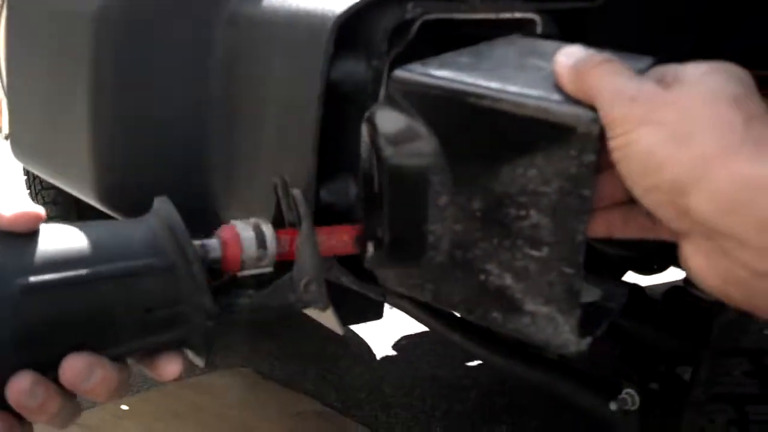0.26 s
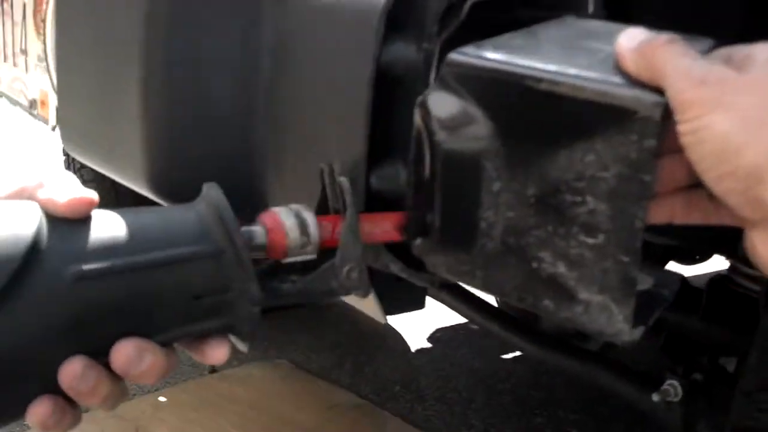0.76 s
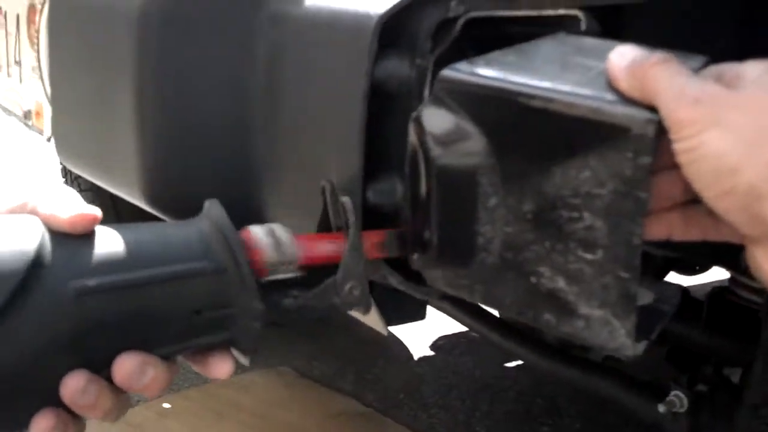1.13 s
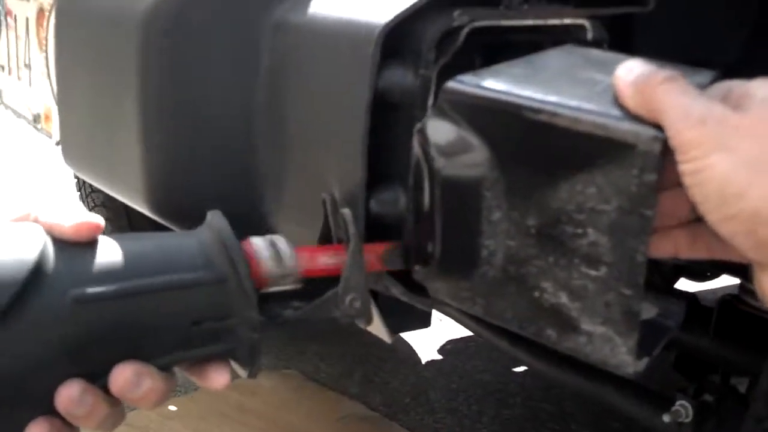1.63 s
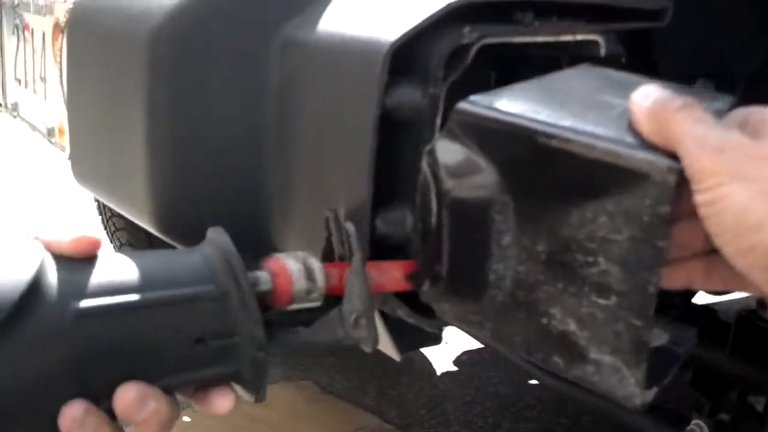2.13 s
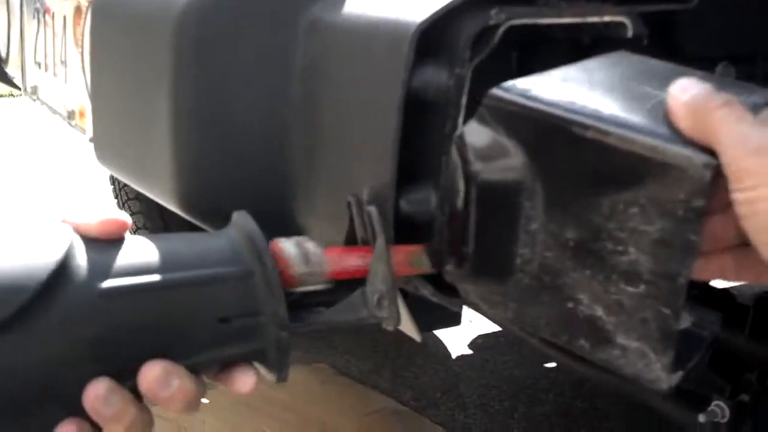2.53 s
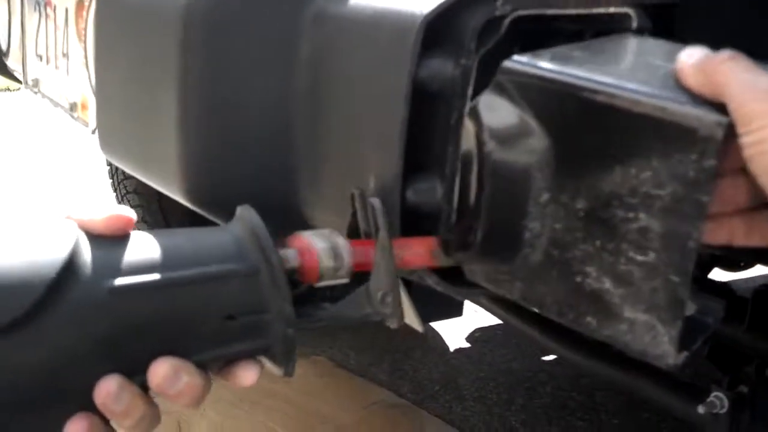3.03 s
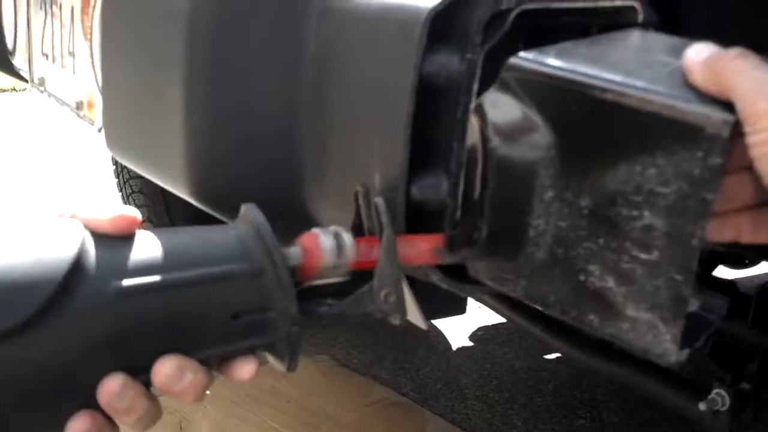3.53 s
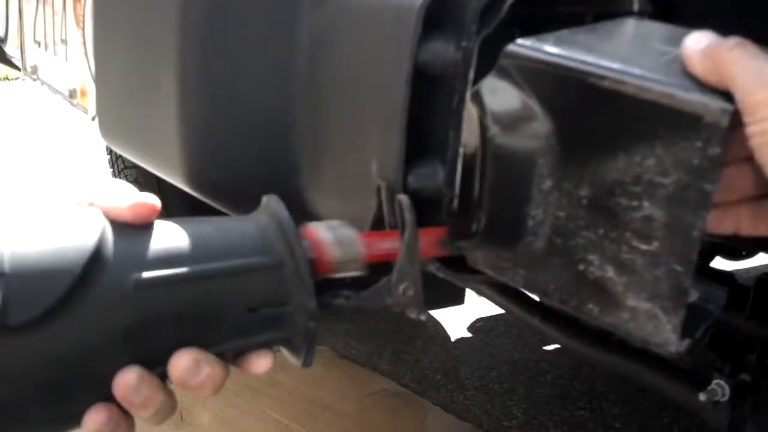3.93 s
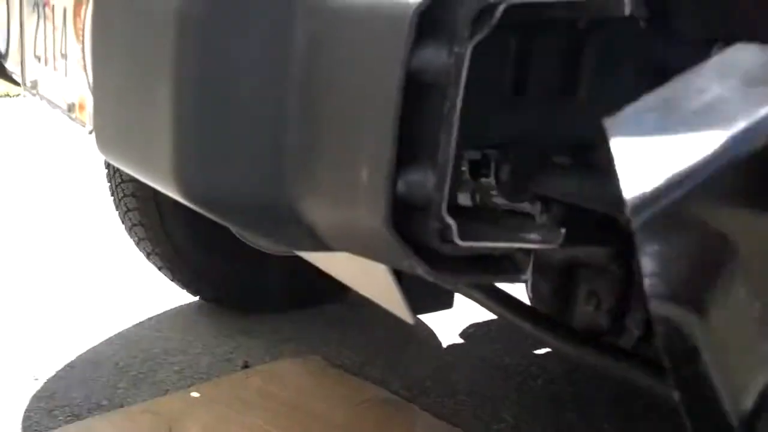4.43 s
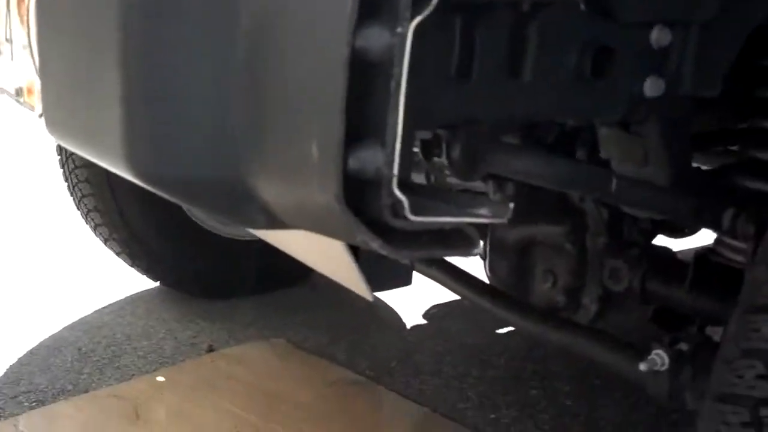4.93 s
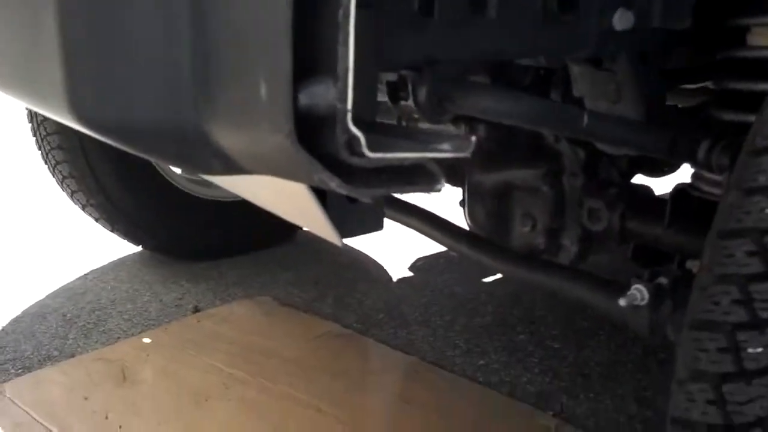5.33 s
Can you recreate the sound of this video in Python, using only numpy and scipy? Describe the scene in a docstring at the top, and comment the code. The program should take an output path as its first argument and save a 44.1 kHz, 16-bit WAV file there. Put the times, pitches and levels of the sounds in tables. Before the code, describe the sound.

A reciprocating saw revs up and chatters harshly through a steel bumper, breaks free, whines down, and the cut piece clangs on the floor.

```python
"""Reciprocating saw cutting a steel bumper

A motor speeds up; its blade catches, then cuts the end off a steel bumper, chattering on every stroke.
The blade breaks through, the motor runs free and coasts down while its cooling air buffets the microphones,
and the cut-off piece clangs on the floor. Noise and clicks excite resonances; tones follow the motor speed.
Two close microphones are combined into a wide stereo pair."""
import sys
import numpy as np
from scipy import signal
from scipy.fft import rfft, irfft, next_fast_len
from scipy.io import wavfile
from scipy.ndimage import uniform_filter1d

SR = 44100
rng = np.random.default_rng(int(sys.argv[2]) if len(sys.argv) > 2 else 0)


def output_pcm(signal):
    """Save a mono or channel-first signal as 16-bit PCM at the path in sys.argv[1].

    Samples are clipped to [-1, 1] before scaling.
    """
    pcm = np.clip(np.atleast_2d(signal).T, -1, 1) * 32767
    wavfile.write(sys.argv[1], SR, np.round(pcm).astype(np.int16))


N = 246078
TIME = np.arange(N) / SR
# Levels in the tables are relative: later gains set the final loudness.


def from_db(db):
    """Logarithmic level: decibels to amplitude gain."""
    return 10 ** (np.asarray(db) / 20)


def rms_one(x):
    """Normalisation: scale to unit root mean square."""
    return x / np.sqrt(np.mean(x ** 2) + 1e-20)


def level(x):
    """Gain control: hold the running rms near 1 over about two full-speed strokes."""
    return x / np.sqrt(np.abs(uniform_filter1d(x * x, SR // 22)) + 1e-9)


def in_time(rows):
    """Linear interpolation: each column of a curve, at every sample."""
    s, *columns = np.transpose(rows)
    return [np.interp(TIME, s, c) for c in columns]


def butter(x, hz, kind, order=2):
    """Causal Butterworth filtering."""
    return signal.sosfilt(signal.butter(order, hz, kind, fs=SR, output="sos"), x + 1e-18)


def colour(x, spectrum):
    """Spectral shaping: weight each frequency by a smooth curve on a logarithmic axis."""
    size = next_fast_len(N + 4096)
    hz, db = np.transpose(spectrum)
    bins = np.fft.rfftfreq(size, 1 / SR) + 1
    gain = from_db(np.interp(np.log(bins), np.log(hz), db))
    return irfft(rfft(x, size) * gain, size)[..., :N]


def drift(rate):
    """Slow random modulation of rms 1, changing about rate times a second."""
    knots = rng.standard_normal(4096)
    return rms_one(np.interp(TIME * rate, np.arange(len(knots)), knots))


def resonance(x, hz, width):
    """Damped oscillator: a two-pole resonance with gain 1 at its top."""
    r = np.exp(-np.pi * width / SR)
    poles = [1, -2 * r * np.cos(2 * np.pi * hz / SR), r * r]
    return signal.lfilter(np.array([1, 0, -1]) * (1 - r * r) / 2, poles, x + 1e-18)


def bursts(events, t60):
    """Exponential decay: an envelope that jumps at each (start_s, level_db) and dies away."""
    return sum((TIME >= s) * from_db(db - 60 * np.abs(TIME - s) / t60) for s, db, *_ in events)


def knocks(turns, contacts, loose, scatter_db, slip):
    """Periodic impacts with jitter: looseness scatters the moment and strength of each click."""
    out = np.zeros(N)
    for share, db in contacts:
        early, force = rng.standard_normal((2, 300))
        cycle = np.arange(len(early)) + share
        play = np.interp(cycle, turns, loose)
        at = np.searchsorted(turns, cycle + slip * play * early)
        heard = at < N
        out[at[heard]] += from_db(db + scatter_db * play * force)[heard]
    return rms_one(out)


def smear(clicks, seconds):
    """Relaxation: each click becomes a decaying swell of the given time constant; mean 1."""
    swell = signal.lfilter([1], [1, -np.exp(-1 / (seconds * SR))], np.abs(clicks) + 1e-18)
    return swell / swell.mean()


def at_microphones(x, apart_hz=750, scatter_db=-1, nearer_db=2.0):
    """Diffuse reflection: echoes off the car body differ between microphones, except in the bass."""
    size, scatter_s = 2048, 0.0066
    echoes = rfft(rng.standard_normal(size) * np.exp(-TIME[:size] / scatter_s))
    # keep only the phase, so that the echoes favour no pitch
    even = np.roll(irfft(echoes / np.abs(echoes)), SR // 1000)[:size // 2]
    apart = from_db(scatter_db) * butter(signal.fftconvolve(x, even)[:N], apart_hz, "high", order=1)
    return x * from_db([[nearer_db], [-nearer_db]]) + np.array([apart, -apart])


# Spectrum of turbulent pressure on the microphones: pitch_hz, level_db
TURBULENCE_SPECTRUM = [(20, 4.5), (60, -7), (120, -2.5), (220, -6.5), (400, -16), (800, -26), (3000, -68)]
# Strong gusts of cooling air: centre_s, level_db, half_length_s
AIR_GUSTS = [(0.98, -27, 0.02), (1.33, -27.5, 0.06), (1.52, -28, 0.035), (3.81, -32, 0.05),
             (4.19, -34, 0.14), (4.465, -25, 0.06), (4.85, -29, 0.2)]


def draught(speed, draught_db=0, eddy_db=-52, eddy_swing_db=6, deep_db=-3, rumble_db=-59):
    """Turbulence: lumpy noise, independent at each microphone; only strong gusts bring much deep bass."""
    gust = sum(from_db(db) * np.exp(-((TIME - s) / width) ** 4) for s, db, width in AIR_GUSTS)
    stray = speed ** 2 * from_db(eddy_db + eddy_swing_db * drift(10))
    eddies = rms_one(colour(rng.standard_normal((2, N)), TURBULENCE_SPECTRUM))
    light = butter(eddies, 110, "high", order=3)
    deep = butter(eddies, [55, 110], "band", order=3)
    reach = from_db(deep_db) * np.minimum(gust / .05, 1)
    flutter = from_db(draught_db + 4.3 * drift(70))
    return flutter * (gust + stray) * (light + reach * deep) + from_db(rumble_db) * eddies


# The piece lands and bounces: start_s, level_db, flatness (0 on an edge, 1 flat)
LANDINGS = [(5.269, -24.5, 0), (5.348, -36, .6), (5.399, -29, 1)]
# Modes of the piece: pitch_hz, edge_level_db, flat_level_db, t60_s
PIECE_MODES = [(281, -15, -15, .5), (523, -17, -16, .6), (575, -16, -18, .5), (593, -6, -9, .8),
               (1094, -7, -4, .9), (1158, -15, -15, .6), (1432, 1, -12, .6), (1623, -15, -5, .9),
               (1836, -13, -9, .8), (1970, -14, -16, .8), (2147, -11, -10, .6), (3203, -14, -22, .7),
               (3461, -19, -14, .7), (3698, -20, -13, .8), (3732, -20, -16, .8), (3780, -16, -18, .7),
               (4226, -22, -15, .8), (4418, -20, -11, .6), (4544, -22, -14, .7), (4732, -14, -12, .6),
               (5170, -15, -18, .4), (5970, -15, -13, .35), (6405, -21, -9, .5), (7251, -15, -20, .28),
               (9700, -24, -21, .27)]
# Spectrum of rough contact, on the floor and in the gears: pitch_hz, level_db
ROUGH_SPECTRUM = [(60, -59), (150, -13), (500, 1), (1000, -4), (1800, -14), (2600, 1), (4000, -10),
                  (8000, -17.5), (16000, -15)]
SETTLES_S, SETTLE_DB_PER_S = 5.49, 108


def falling_piece(crack_db=-13, scuff_db=-11, buzz_db=-6, taps_per_s=260):
    """Modal ringing: each landing adds energy; tiny floor taps buzz until the piece settles and is damped."""
    out = np.zeros(N)
    t = TIME[TIME >= LANDINGS[0][0]]
    for hz, edge_db, flat_db, t60 in PIECE_MODES:
        rings = []
        for s, db, flat in LANDINGS:
            struck_db = db + edge_db + flat * (flat_db - edge_db)
            rings.append((t >= s) * from_db(struck_db - 60 * (t - s) / t60))
        # energies add, so amplitudes combine as a root of squares
        out[-len(t):] += np.linalg.norm(rings, axis=0) * np.sin(2 * np.pi * (hz * t + rng.random()))
    taps = (rng.random(N) < taps_per_s / SR) * rng.choice([-1, 1], N)
    buzz = rms_one(sum(from_db((edge_db + flat_db) / 2) * resonance(taps, hz, 70)
                       for hz, edge_db, flat_db, _ in PIECE_MODES))
    grit = rms_one(colour(smear(taps, seconds=.005) * rng.standard_normal(N), ROUGH_SPECTRUM))
    out += from_db(crack_db) * bursts(LANDINGS, t60=0.022) * grit
    skitter = bursts(LANDINGS, t60=0.51) - bursts(LANDINGS, t60=0.055)
    out += skitter * (from_db(scuff_db) * grit + from_db(buzz_db) * buzz)
    return out * from_db(-SETTLE_DB_PER_S * np.maximum(TIME - SETTLES_S, 0))


# Dull knocks, as the saw jolts in the cut and is then pulled away: start_s, level_db, pitch_hz
JOLT_KNOCKS = [(1.277, -15, 330), (1.359, -14, 300), (1.794, -19, 290), (1.886, -16, 300),
               (3.774, -14, 270), (4.313, -13, 320), (4.772, -11.5, 300), (4.838, -19, 260),
               (4.867, -20, 620), (4.885, -22, 460), (4.937, -24, 510), (4.944, -16, 215),
               (5.007, -28, 312)]


def thumps(grit_db=-16):
    """Heavily damped oscillation: each knock is a few cycles with a brief scuff."""
    out = np.zeros(N)
    scuff = rms_one(butter(rng.standard_normal(N), [300, 800], "band", order=3))
    cycles = 7  # until 60 dB down
    for s, db, hz in JOLT_KNOCKS:
        age = np.maximum(TIME - s, 0)
        knock = np.sin(2 * np.pi * hz * age) + from_db(grit_db) * scuff
        out += bursts([(s, db)], t60=cycles / hz) * knock
    return butter(out, [110, 1100], "band")


# Motor speed, as the pitch of its fan: trigger half pressed, at full speed in the cut, running free
START_HZ, CUTTING_HZ, FREE_HZ = 2300, 4532, 4660
# The trigger is squeezed around SQUEEZE_S; the blade breaks through; the trigger is let go
SQUEEZE_S, THROUGH_S, LET_GO_S = 0.75, 4.306, 4.57
# Time constants: speeding up, being pinched by the sagging piece, racing free, coasting
SPIN_UP_S, PINCH_S, RACE_S, COAST_S = 0.18, 0.3, 0.13, 1.32
PINCH_HZ, WAVER_HZ = 95, 10
FAN_CYCLES_PER_STROKE = 102.1


def fan_pitch():
    """Rotor inertia: speed up, be pinched as the cut closes, race once free, then coast down."""
    driven = START_HZ + (CUTTING_HZ - START_HZ) / (1 + np.exp((SQUEEZE_S - TIME) / SPIN_UP_S))
    pinch = PINCH_HZ * np.exp(np.minimum(TIME - THROUGH_S, 0) / PINCH_S)
    loaded = driven - pinch + WAVER_HZ * drift(5)
    freed = 1 - np.exp(-np.clip(TIME - THROUGH_S, 0, LET_GO_S - THROUGH_S) / RACE_S)
    return (loaded + freed * (FREE_HZ - loaded)) * np.exp(-np.maximum(TIME - LET_GO_S, 0) / COAST_S)


def gear_drone(fan_hz, turns):
    """Harmonic tones: gears loaded by speeding up drone on a few multiples of the stroke rate."""
    drone_db = -34
    speed = fan_hz / CUTTING_HZ
    pull = np.clip(1 - speed, 0, 1) ** .7 * speed ** 6 * np.clip((1.4 - TIME) / .15, 0, 1)
    tones = 0
    for k in range(9, 12):
        phase = 2 * np.pi * (k * turns + rng.random()) + .3 * drift(20)
        tones = tones + from_db(3 * drift(14)) * np.sin(phase)
    return from_db(drone_db) * pull / pull.max() * rms_one(tones)


# Resonances of the motor's vents: pitch_hz, width_hz, level_db
VENT_MODES = [(4560, 350, -2), (3950, 400, -3), (3100, 200, -1), (6400, 700, -10), (9150, 400, 0)]


def whine(turns, speed, whine_db=-35.0):
    """Source and filter: fluttering fan overtones stand out where they meet vent resonances."""
    phase = 2 * np.pi * FAN_CYCLES_PER_STROKE * turns + .4 * drift(130)
    overtones = [(1, 0), (2, 0), (3, -9)]  # multiple, level_db
    tones = sum(from_db(db + 2 * drift(60)) * np.sin(k * phase) for k, db in overtones)
    # alternate the polarity from one table row to the next
    vents = sum((-1) ** k * from_db(db) * resonance(tones, hz, width)
                for k, (hz, width, db) in enumerate(VENT_MODES))
    return from_db(whine_db) * speed ** 2 * vents


# Spectrum of the fan rush: pitch_hz, level_db
FAN_RUSH_SPECTRUM = [(60, -55), (140, -15), (300, 11.5), (800, 4.5), (1700, 8.5), (2500, 9.5), (4000, -1),
                     (7000, 5), (10000, -1.5), (16000, -7.5)]
# Crank knocks: two strong ones per stroke, half a cycle apart, each followed by a lighter one:
# share_of_cycle, level_db
CRANK_KNOCKS = [(.1, 0), (.35, -4), (.6, -1), (.85, -5)]
CASE_HZ, CASE_WIDTH_HZ = 1644, 460


def motor(fan_hz, turns, air_db=-28.5, air_power=3.5, gears_db=-38, case_db=-42):
    """Flow noise grows as a power of speed; gears whirr and crank impacts ring the gear case."""
    speed = fan_hz / fan_hz.max()
    rush = rms_one(colour(rng.standard_normal((2, N)), FAN_RUSH_SPECTRUM))
    air = from_db(air_db + drift(150)) * speed ** air_power * rush
    impacts = knocks(turns, CRANK_KNOCKS, np.ones(N), scatter_db=1, slip=.012)
    whirr = smear(impacts, seconds=.02) * rng.standard_normal(N)
    rattle = smear(impacts, seconds=.005) * rng.standard_normal(N)
    gears = from_db(gears_db) * rms_one(colour(whirr, ROUGH_SPECTRUM))
    case = from_db(case_db) * rms_one(resonance(rattle, CASE_HZ, CASE_WIDTH_HZ))
    return air + at_microphones(gears + case) + at_microphones(whine(turns, speed))


def disperse(x, delay_s=.004):
    """Dispersion: bending waves cross sheet steel faster the higher they are; the delay is that at 1 kHz."""
    size = next_fast_len(N + 4096)
    hz = np.fft.rfftfreq(size, 1 / SR)
    return irfft(rfft(x, size) * np.exp(-4j * np.pi * delay_s * np.sqrt(1000 * hz)), size)[:N]


# Strong bumper resonances: pitch_hz, width_hz, level_db
BUMPER_MODES = [(289, 51, 4.5), (500, 130, -13), (694, 9.1, -1), (1029, 62, -1), (1398.7, 29.5, 2),
                (1963, 8.4, -0.5), (1636, 6.3, -0.5), (1097, 31, -5.5), (2010, 17, -5), (2560, 14, 6.5),
                (3193, 14.2, 6), (3458, 4.3, 4), (4630, 23, -4), (5800, 8.5, 4), (6795, 26, -6.5)]
# Response of the dense, damped modes of the sheet: pitch_hz, level_db
PANEL_RESPONSE = [(60, -48), (150, -68), (250, -13.5), (500, 1.5), (850, -2.5), (1200, -10), (2000, -49),
                  (2800, 15), (4000, -65), (8000, -39), (16000, -51)]


def bumper(force, panel_db=-9, gap_hz=1275, gap_width_hz=90, gap_depth=0.79):
    """Modal superposition: strong resonances stand over the dense, damped modes of the sheet steel."""
    rings = sum(from_db(db) * resonance(force, hz, width) for hz, width, db in BUMPER_MODES)
    steel = rings + from_db(panel_db) * colour(force, PANEL_RESPONSE)
    # a dip in level around 1275 Hz, between two strong resonances
    return steel - gap_depth * resonance(steel, gap_hz, gap_width_hz)


# Steady shaking of the bumper: multiple_of_stroke_rate, level_db
SHAKE_HARMONICS = [(7, 7), (12, -11), (14, -10), (15, -5), (16, 1), (18, -9), (20, -11), (21, -10),
                   (22, -10), (23, 2), (24, -10), (31, -5), (32, 0), (33, -7), (34, -10), (37, -4),
                   (38, -8), (40, -5), (41, -10), (42, -8), (44, -5), (45, -7), (46, -6), (47, -8),
                   (48, -7)]


def shake(struck, turns, waver_db=4):
    """Forced vibration: stroke-rate harmonics, in step with the hammering that feeds them, waver a little."""
    out, wander = 0, .3  # phase wander in radians
    for k, db in SHAKE_HARMONICS:
        phase = 2 * np.pi * k * turns
        lead = np.angle(struck[::4] @ np.exp(-1j * phase[::4]))
        out = out + from_db(db + waver_db * drift(7.7)) * np.cos(phase + lead + wander * drift(16))
    return rms_one(out)


# The blade passes nodes and antinodes of the main resonances:
# pitch_hz, mean_db, swing_db, antinode_depth, antinode_spacing (depths as shares of the slot)
ANTINODES = [(359, -4.5, 8, 0.0033, 1.22), (644, 2, 3, 0.46, 0.58), (986, -1, 4.5, 0.83, 0.8),
             (1440, 2, 1, 0.2, 1.9), (2010, 0, 7.5, 0.75, 3)]
# The slot deepens faster as less steel is left: depth 0-1 = (share of the cutting time) ** DEEPENING
DEEPENING = 1.03


def slot_depth(x, width_hz=206):
    """Mode shapes: as the slot deepens, the place of contact favours one resonance after another."""
    depth = np.minimum(TIME / THROUGH_S, 1) ** DEEPENING
    out = x
    for hz, mean_db, swing_db, antinode, spacing in ANTINODES:
        gain = from_db(mean_db + swing_db * np.cos(2 * np.pi * (depth - antinode) / spacing))
        out = out + (gain - 1) * resonance(x, hz, width_hz)
    return out


# The blade bears on one resonance and makes it sing, or damps it: start_s, end_s, pitch_hz, level_db
# (a row that ends well before it starts stays silent)
SUNG_MODES = [(1.0, 0.98, 1540, 2.5), (1.2, 1.2, 720, 0), (1, 2.3, 1130, 1.5), (2, 1.3, 1470, 6.5),
              (1.886, 2.224, 1380, 2.5), (2.233, 2.3, 1350, -3), (2.21, 3.5, 670, 3), (2.4, 2.6, 336, 4.5),
              (2.92, 3.29, 1430, -5.5), (2.955, 3, 990, 2.5), (2.3, 3.718, 1540, -2),
              (3.72, 4.298, 830, 5.5), (3.5, 4.314, 690, 4.5), (3.4, 3.84, 1420, 4),
              (3.84, 4.19, 1650, 8.5), (4.2, 4.31, 1540, 7), (5.1, 4.31, 1960, 3)]


def singing(x, turns, width_hz=130, fade_s=0.013):
    """Selective resonance: a favoured mode swells and throbs once a stroke; a damped one recedes."""
    throb = 1 + .7 * np.cos(2 * np.pi * (turns - .15))
    out = x
    for start, end, hz, db in SUNG_MODES:
        held = np.clip(np.minimum(TIME - start, end - TIME) / fade_s + .5, 0, 1)
        pulse = throb if db > 0 else 1
        out = out + (from_db(db) - 1) * held * pulse * resonance(x, hz, width_hz)
    return out


def chatter(hits, pressure, turns, loose, shake_db=-.5, lowest_hz=200):
    """Impact and friction ring the bumper; a firmly seated blade also forces clean stroke multiples."""
    scrape = (.1 + .35 * loose) * pressure * rng.standard_normal(N)
    struck = level(bumper(disperse(hits) + scrape))
    steady = from_db(shake_db) * (1 - loose) ** 2 * shake(struck, turns)
    ringing = level(butter(struck + steady, lowest_hz, "high", order=4))
    return singing(slot_depth(ringing), turns)


# Spectrum of the tearing teeth: pitch_hz, level_db
TEETH_SPECTRUM = [(100, -60), (300, -5.5), (1500, 7), (2600, 9), (3400, 3), (4050, 1.5), (4600, 5),
                  (5600, 2), (6900, -1), (7700, -9), (10000, -1.5), (12500, -4), (14300, -10.5),
                  (15800, 1.5)]


def tooth_rasp(pressure, turns, stroke_depth=0.13, chips_per_s=520, chip_share=0.54, gated=0.045,
               surge_db=1.1):
    """Modulated noise: each chip is a tiny burst; teeth run fastest twice a cycle and bite harder on the pull."""
    sweep = 1 + stroke_depth * (np.cos(4 * np.pi * turns) + np.cos(2 * np.pi * turns))
    chips = smear((rng.random(N) < chips_per_s / SR) * rng.uniform(0.36, 1, N), seconds=0.015)
    tearing = 1 - chip_share + chip_share * chips
    pressing = 1 - gated + gated * pressure
    bite = from_db(surge_db * drift(24.37)) * sweep * tearing * pressing
    return rms_one(colour(rng.standard_normal((2, N)) * bite, TEETH_SPECTRUM)) * from_db([[1], [-1]])


CATCH_ATTACK_S, RELEASE_DB_PER_S = 0.00079, 639


def touching(start, end):
    """Contact envelope: attack, hold and release between blade and steel."""
    attack = np.clip((TIME - start) / CATCH_ATTACK_S, 0, 1)
    return attack * from_db(-RELEASE_DB_PER_S * np.maximum(TIME - end, 0))


# The blade skips and catches before it has a slot: start_s, length_s, chatter_db, rasp_db
EARLY_CATCHES = [(0.0, 0.013, -30, -25.5), (0.042, 0.021, -31, -34), (0.089, 0.12, -25, -26.5),
                 (0.215, 0.021, -19.5, -22.5), (0.247, 0.052, -17, -24), (0.35, 0.032, -26, -28.5),
                 (0.394, 0.015, -22.5, -21.5), (0.416, 0.086, -18.5, -22.5), (0.53, 0.056, -24.5, -23),
                 (0.595, 0.062, -19, -22)]
# How hard the seated blade is fed into the steel: time_s, chatter_db, rasp_db
FEED_PRESSURE = [(0.69, -17.5, -22.5), (0.79, -22, -21.5), (1.2, -16.5, -18.5), (1.31, -20, -20),
                 (1.47, -14.5, -18), (2.37, -16.5, -17.5), (2.64, -21, -20), (3.09, -19, -19.5),
                 (4.22, -20, -21), (4.29, -17.5, -24)]
SEATED_S = 0.671


def engagement(seated_chatter_db=1.5, seated_rasp_db=-0.68):
    """Contact force sets chatter and rasp: a few short catches, then one long cut until through."""
    chatter_db, rasp_db = in_time(FEED_PRESSURE)
    seated = from_db([chatter_db + seated_chatter_db, rasp_db + seated_rasp_db])
    seated = seated * touching(SEATED_S, THROUGH_S)
    catches = [from_db([[hammer_db], [tooth_db]]) * touching(s, s + length)
               for s, length, hammer_db, tooth_db in EARLY_CATCHES]
    return np.max([seated, *catches], axis=0)


# How loosely the blade bounces in the slot: time_s, looseness (0-1)
BLADE_LOOSENESS = [(0.8, 0.95), (1.3, 0.62), (1.85, 0.6), (2.05, 0.3), (2.25, 0.15), (3.65, 0.15),
                   (3.8, 0.6), (4.0, 0.33), (4.3, 0.45)]
# Blade contacts within one stroke: share_of_cycle, level_db
BLADE_CONTACTS = [(0.021, 5), (.135, 0.5), (.255, 1.5), (0.377, 1), (0.5, 5), (0.601, 5), (0.719, 2.5),
                  (0.863, -6)]
# The blade snags and kicks the bumper: start_s, level_db
BLADE_SNAGS = [(0.034, -15.5), (0.078, -14), (0.12, -15), (0.252, -9), (0.428, -12), (0.457, -9),
               (0.541, -9), (0.6, -15), (0.779, -13), (3.786, -13)]


def cutting(turns, chatter_db=-6.0, rasp_db=-1, snag_db=8.0, thud_db=-12):
    """Repeated impact: the blade hammers the slot, hardest in mid-sweep; a snag adds a kick and a dull thud."""
    hammering, tearing = engagement()
    loose = in_time(BLADE_LOOSENESS)[0]
    hits = knocks(turns, BLADE_CONTACTS, loose, scatter_db=4.5, slip=.008)
    pressure = smear(hits, seconds=.0022)
    sweep_db = 1.3 * np.cos(4 * np.pi * turns) + 1.1 * np.cos(2 * np.pi * turns)
    body = hammering * from_db(chatter_db + sweep_db) * chatter(hits, pressure, turns, loose)
    jolts = bursts(BLADE_SNAGS, t60=.06) * rng.standard_normal(N)
    dull = rms_one(butter(rng.standard_normal(N), [220, 420], "band", order=3))
    thuds = bursts(BLADE_SNAGS, t60=.12) * dull
    kicks = from_db(snag_db) * bumper(jolts) + from_db(thud_db) * thuds
    kicks = butter(kicks, 180, "high", order=3)
    rasp = tearing * from_db(rasp_db) * tooth_rasp(pressure, turns)
    return at_microphones(body + kicks) + rasp


def scene():
    """Common drive: one motor speed sets the stroke, the cut and the fan."""
    fan_hz = fan_pitch()
    turns = np.cumsum(fan_hz) / SR / FAN_CYCLES_PER_STROKE  # strokes completed
    background = draught(fan_hz / FREE_HZ) + at_microphones(gear_drone(fan_hz, turns) + falling_piece())
    saw = at_microphones(thumps(), nearer_db=5) + motor(fan_hz, turns) + cutting(turns)
    return background + saw


PAIR_LAG = 16  # samples
CUTOFF_HZ = 15800


def pair_nulls(x, null_width_hz=400, widening=0.018):
    """Destructive interference: the pair is deaf where its delay is a whole number of cycles."""
    for hz in SR / PAIR_LAG * np.arange(1, 6):
        half = (null_width_hz + widening * hz) / 2
        x = butter(x, [hz - half, hz + half], "bandstop", order=3)
    return x


def record(dry):
    """Pressure-gradient pair: each channel is one microphone minus the delayed other; the top is cut."""
    delayed_other = np.pad(dry[::-1], ((0, 0), (PAIR_LAG, 0)))[:, :N]
    wide = pair_nulls(dry - delayed_other)
    low_pass = signal.ellip(12, .1, 90, CUTOFF_HZ, fs=SR, output="sos")
    return signal.sosfilt(low_pass, np.clip(wide, -.9, .9))


dry = scene()
out = record(dry)
output_pcm(out)
```